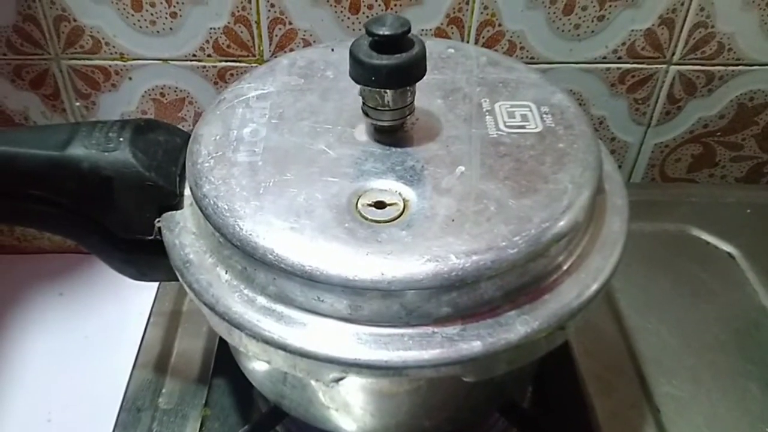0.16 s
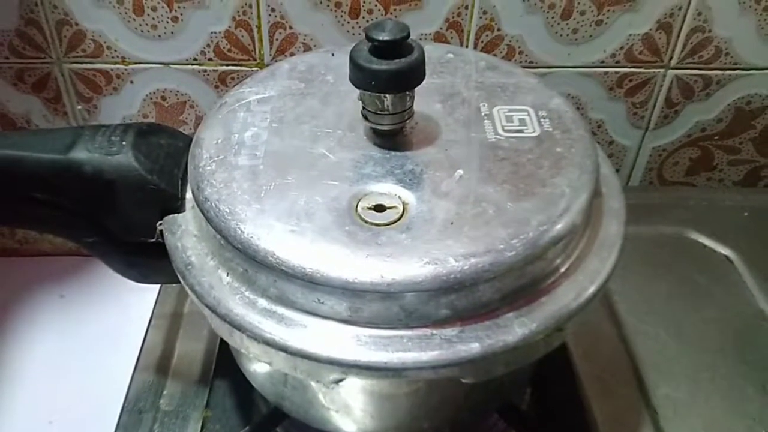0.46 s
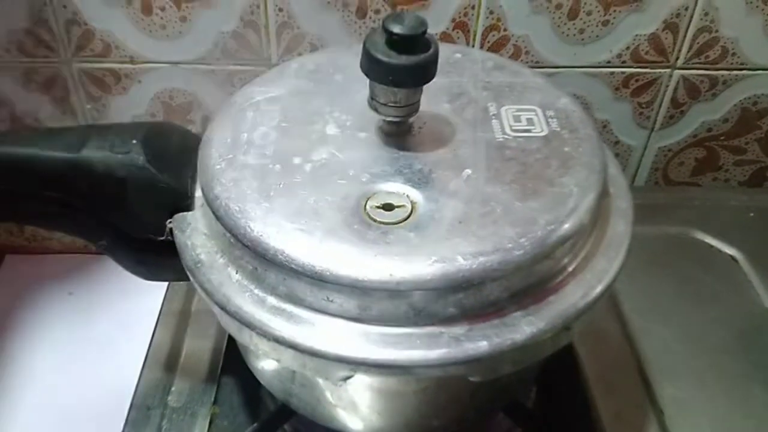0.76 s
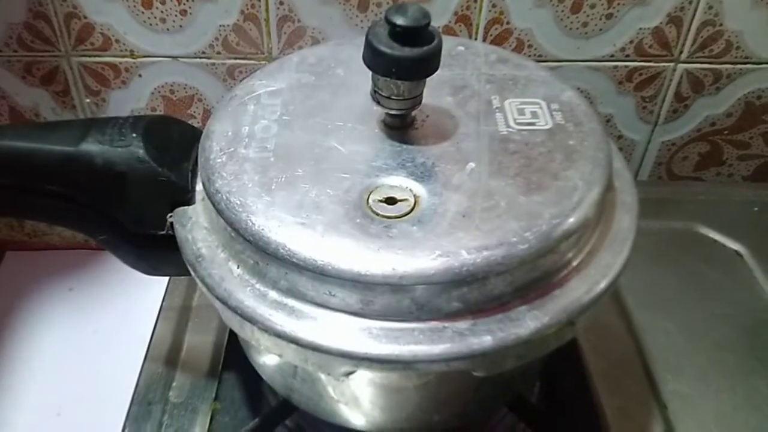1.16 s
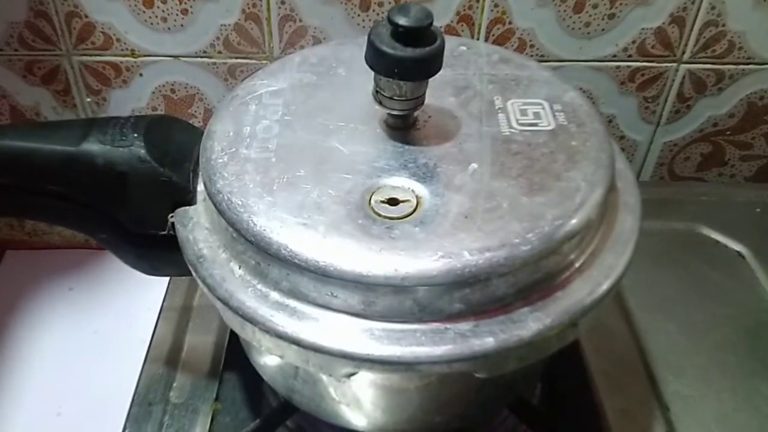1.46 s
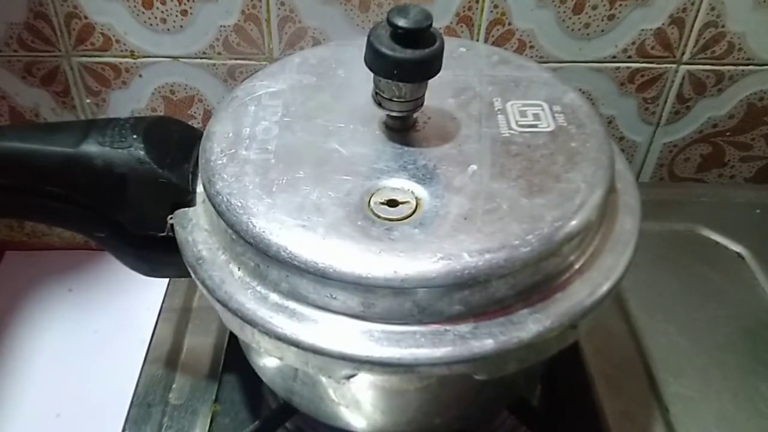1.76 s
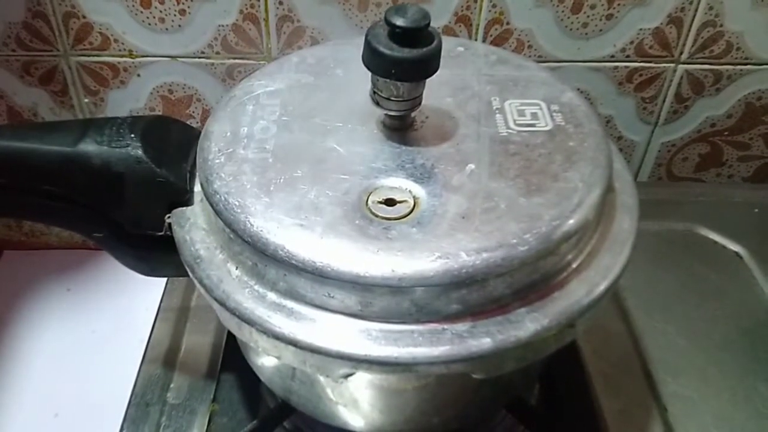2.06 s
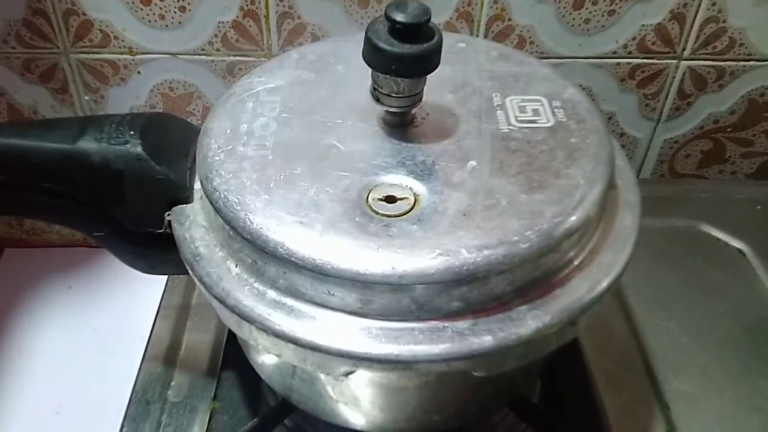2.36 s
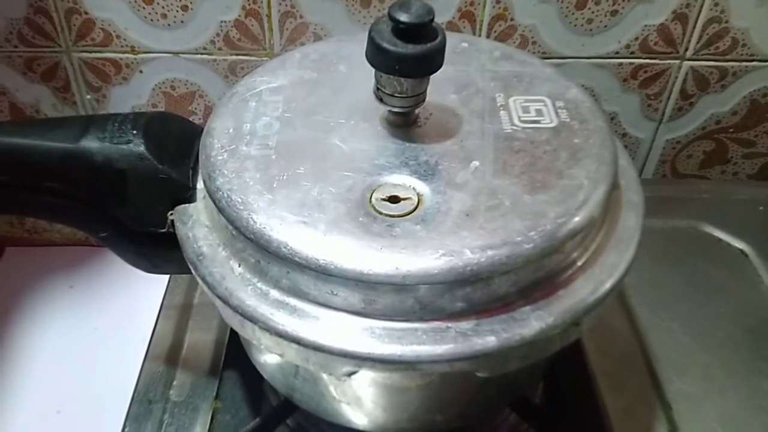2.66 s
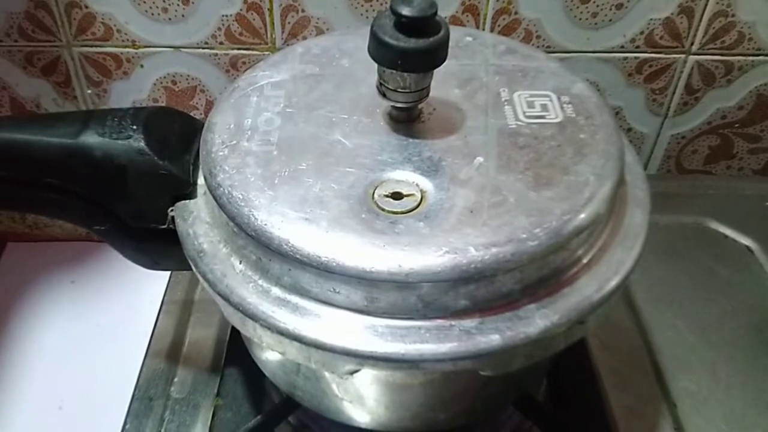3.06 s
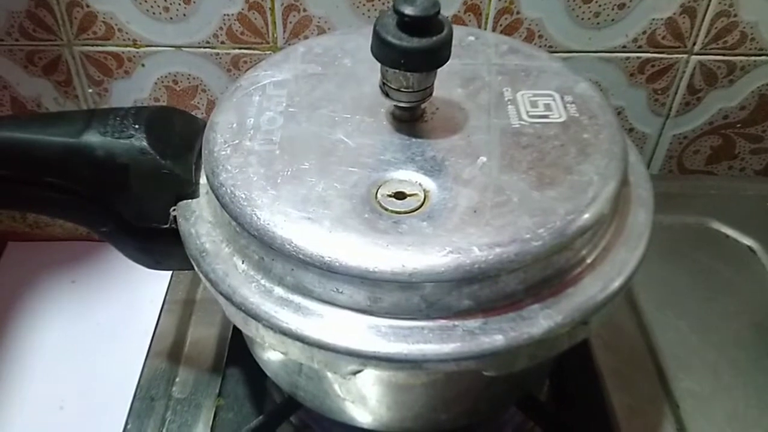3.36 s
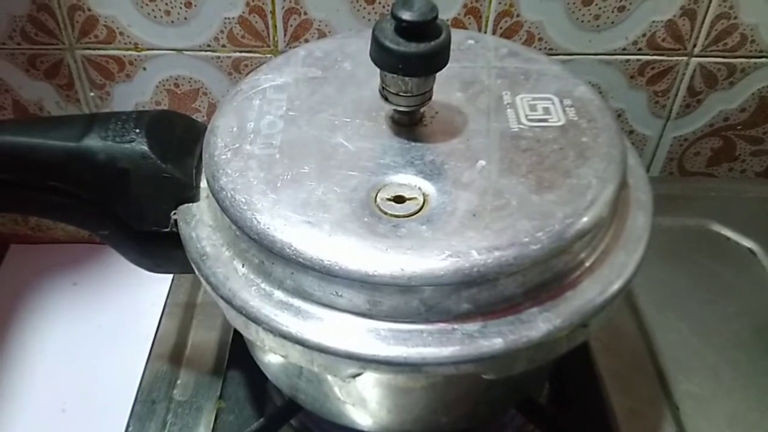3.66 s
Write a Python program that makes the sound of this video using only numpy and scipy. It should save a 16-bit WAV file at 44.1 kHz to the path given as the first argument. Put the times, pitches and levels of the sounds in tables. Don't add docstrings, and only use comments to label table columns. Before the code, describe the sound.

A pressure cooker valve suddenly releases a harsh, bright rush of steam in a kitchen

```python
import sys
import numpy as np
from scipy import signal
from scipy.fft import rfft, irfft, next_fast_len
from scipy.io import wavfile
from scipy.ndimage import uniform_filter1d

SR = 44100
rng = np.random.default_rng(int(sys.argv[2]) if len(sys.argv) > 2 else 0)


def wav_out(sig):
    wavfile.write(sys.argv[1], SR, np.round(np.clip(np.atleast_2d(sig).T, -1, 1) * 32767).astype(np.int16))


def level_to_linear(level):
    exponent = np.asarray(level, float) / 20
    return 10 ** exponent


N = 167580
T = np.arange(N) / SR
SIZE = next_fast_len(N + SR)
F = np.maximum(np.arange(SIZE // 2 + 1) * SR / SIZE, 1)
TOP_HZ = 15740


def unit(x):
    return x / np.sqrt(np.mean(x ** 2))


def filtered(x, gain):
    return irfft(rfft(x, SIZE) * gain, SIZE)[..., :N]


def lowpass(hz, order):
    return 1 / (1 + (F / hz) ** order)


def shape(points):
    hz, db = np.transpose(points)
    return level_to_linear(np.interp(np.log(F), np.log(hz), db))


def bumps(rows):
    return level_to_linear(sum(db / (1 + (2 * (F - hz) / width) ** 2) for hz, width, db in rows))


def walk(rate):
    hold = int(SR / rate)
    steps = np.repeat(rng.standard_normal(N // hold + 1), hold)
    slewed = uniform_filter1d(uniform_filter1d(steps, hold), hold)
    return unit(slewed[:N])


# (frequency [Hz], level per Hz [dB])
FLAME_COLOUR = [(25, -42), (42, -20), (60, -2.5), (72, 1), (88, -10), (125, -16), (170, -32), (400, -60)]
# (frequency [Hz], level per Hz [dB])
AIR_COLOUR = [(60, -3), (120, -1), (180, -3), (300, -1.5), (600, -11), (1200, -13), (4000, -34)]
# (time [s], length [s], lift [dB])
FLAME_PUFFS = [(0.04, 0.071, 2.5), (0.206, 0.12, 9.5), (0.41, 0.077, 8), (1.15, .04, -2), (1.82, 0.036, -2),
               (2.15, .04, 7), (2.28, .05, 4), (2.88, 0.077, 6), (3.07, 0.12, 12.5), (3.27, .07, 11.5),
               (3.56, 0.037, 7), (3.76, .05, -1)]


def burner():
    flame_db, flutter_db, air_db = -51, 2.2, -57.5
    steady, steady_s = .6, .05
    flame = filtered(rng.standard_normal((2, N)), shape(FLAME_COLOUR))
    air = filtered(rng.standard_normal((2, N)), shape(AIR_COLOUR))
    power = uniform_filter1d(flame[0] ** 2, int(steady_s * SR))
    flame = flame / power ** (steady / 2)
    puffs_db = sum(db * np.exp(-((T - s) / length) ** 2) for s, length, db in FLAME_PUFFS)
    flame = unit(flame) * level_to_linear(flame_db + puffs_db + flutter_db * walk(7.2))
    mid, side = flame + unit(air) * level_to_linear(air_db)
    return np.array([mid + .15 * side, mid - 0.094 * side])


def turbulence(flicker_db, rate):
    shared, lag_s = .22, -.00017
    left, right = rfft(rng.standard_normal((2, SIZE)))
    right = shared * left * np.exp(-2j * np.pi * F * lag_s) + np.sqrt(1 - shared ** 2) * right
    spectra = np.array([left, right])
    together = walk(rate)
    out = 0
    for k in range(9):
        band = np.cos(np.pi / 2 * np.clip(np.clip(F / 2000, 0, 8) - k, -1, 1)) ** 2
        flicker = flicker_db * (0.61 * together + 0.67 * walk(rate))
        out = out + irfft(spectra * band, SIZE)[:, :N] * level_to_linear(flicker)
    return out


# (frequency [Hz], width [Hz], lift [dB])
LID_CAVITIES = [(2830, 140, 3), (3450, 450, -2), (4690, 90, 3.5), (5490, 150, 3.5), (5650, 90, -3),
                (5820, 100, 4.5), (6560, 100, 5), (7120, 65, 5), (7895, 45, 5), (9050, 50, 6.5),
                (9360, 80, 4), (9920, 60, 4.5), (10466, 50, 7), (11260, 60, 4.5)]
# (frequency [Hz], width [Hz], lift [dB])
PHONE_SHADOWS = [(3900, 400, -3), (5310, 90, -14), (5800, 120, -4), (6700, 60, -6), (7000, 160, -8),
                 (7450, 200, -9), (7750, 80, -6), (8250, 280, -10), (8570, 60, -5), (10450, 300, 3)]


def heard(x, left, right):
    gains = np.array([shape(left) * bumps(LID_CAVITIES), shape(right) * bumps(PHONE_SHADOWS)])
    return filtered(x, gains) / np.sqrt(np.mean(gains[0, F < TOP_HZ] ** 2))


# (time [s], level [dB], strength of the jet's edges [dB])
VALVE_FLOW = [(0, -32.5, 1), (.2, -31, 1), (.3, -31, 1), (.42, -31.5, 3), (.447, -28, 1), (.48, -30, 4),
              (.5, -26.5, -1), (.53, -22.5, 7), (.54, -18.5, 1.5), (.6, -17.5, -2.5), (1.5, -18, -1),
              (2.4, -18.5, 0.7), (3.2, -18.5, -3), (3.8, -18.5, -3.5)]


def valve():
    lift_s, lift_time_s, surge_db = .53, 0.015, 0.25
    time, level_db, edge_db = np.transpose(VALVE_FLOW)
    opened = np.clip((T - lift_s) / lift_time_s + .5, 0, 1)
    level = level_to_linear(np.interp(T, time, level_db) + 7.5 + surge_db * walk(1.93))
    return level, opened, level_to_linear(np.interp(T, time, edge_db))


# (frequency [Hz], level per Hz [dB])
LEAK_LEFT = [(300, -27.5), (1500, -16), (4000, -7), (5900, 1), (8000, -8), (9600, -3), (13900, -10),
             (15500, -20)]
# (frequency [Hz], level per Hz [dB])
LEAK_RIGHT = [(300, -32), (1500, -18.5), (3000, -10), (5900, -22), (8200, -43), (9600, -16), (13500, -12),
              (15500, -24)]


def leak(level):
    return heard(turbulence(1, 44) * level, LEAK_LEFT, LEAK_RIGHT)


# (frequency [Hz], level per Hz [dB])
JET_LEFT = [(1000, -14.5), (2800, -5), (5900, -2), (7000, -3.5), (7900, -8), (9800, 0), (11500, -1),
            (15700, -10.5)]
# (frequency [Hz], level per Hz [dB])
JET_RIGHT = [(800, -27.5), (1700, -14.5), (3100, -7.5), (5000, -10.5), (8100, -28.5), (9300, -10),
             (12500, -8), (15700, -10.5)]


def jet(level, edges):
    roar = heard(turbulence(0.43, 29.87) * level, JET_LEFT, JET_RIGHT)
    low = filtered(roar, lowpass(11000, 8))
    body = filtered(roar, lowpass(3100, 6))
    return low - body + edges * (roar - low) + edges ** .6 * body


def overload(jet_left):
    pressure_drops_s, drop_db_per_s = 2.33, 2.2
    band = (1 - lowpass(48, 4)) * lowpass(2950, 2)
    beats = unit(filtered(jet_left ** 2, band))
    sag_db = 1 * (T - 2) + drop_db_per_s * np.maximum(T - pressure_drops_s, 0)
    beats = beats * level_to_linear(-29 - sag_db + 0.22 * walk(8.2))
    return beats * level_to_linear(np.array([[0], [-30]]))


def steam():
    level, opened, edges = valve()
    thin = leak(level * np.sqrt(1 - opened))
    broad = jet(level * np.sqrt(opened), edges)
    return thin + broad + overload(broad[0])


def scene():
    return burner() + steam()


def roll_off(x):
    return signal.sosfilt(signal.butter(12, 15900, fs=SR, output="sos"), x)


def record(dry):
    ripple_db, ripple_hz, ripple_peak_s = 1.1, 44100 / 1024, (799 + 608) / 44100
    headroom = .89
    x = dry * level_to_linear(ripple_db * np.cos(2 * np.pi * ripple_hz * (T - ripple_peak_s)))
    rounded = x / (1 + (x / headroom) ** 4) ** .25
    mix = filtered(rounded, F < TOP_HZ)
    return roll_off(mix)


dry = scene()
out = record(dry)
wav_out(out)
```